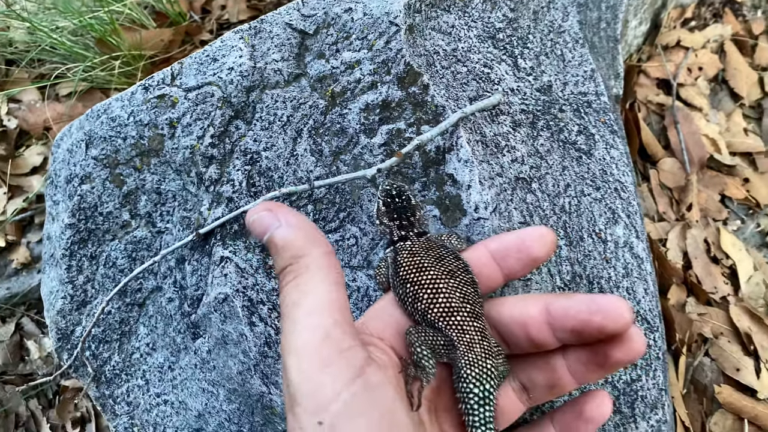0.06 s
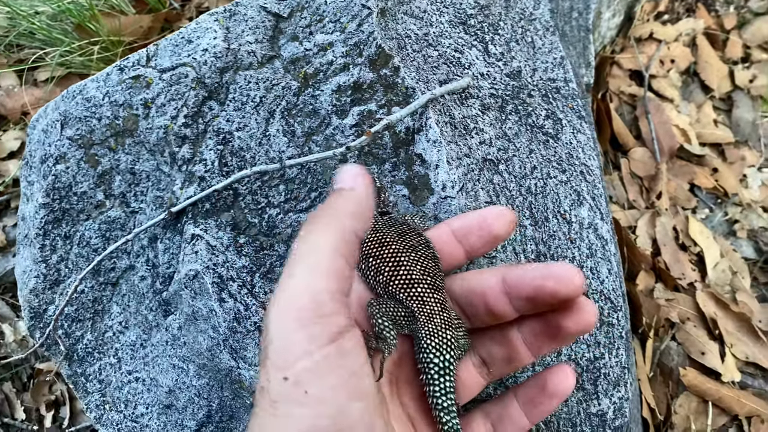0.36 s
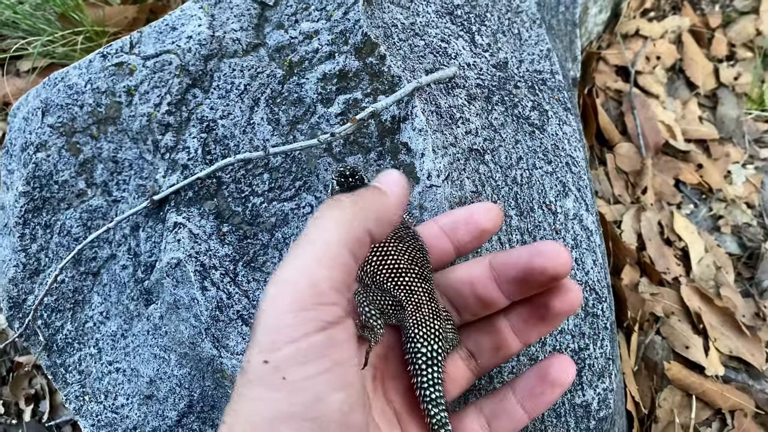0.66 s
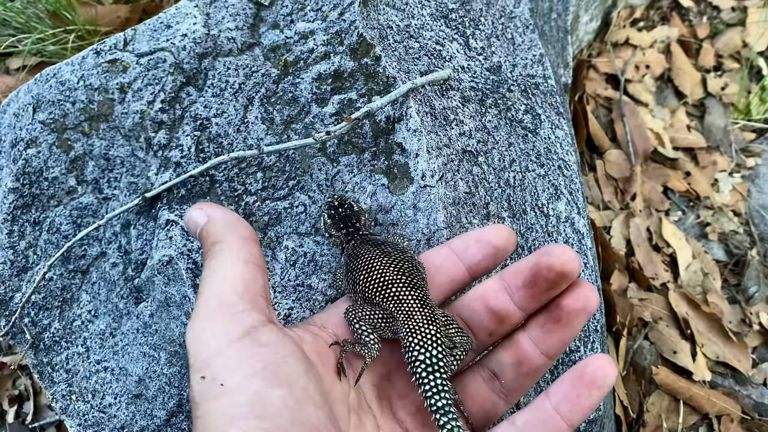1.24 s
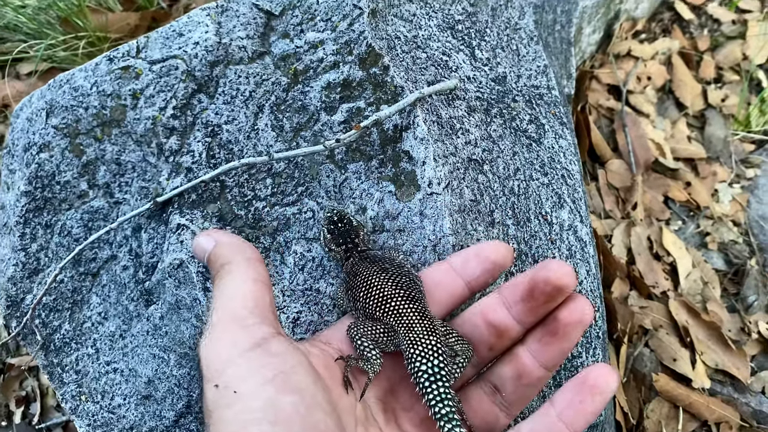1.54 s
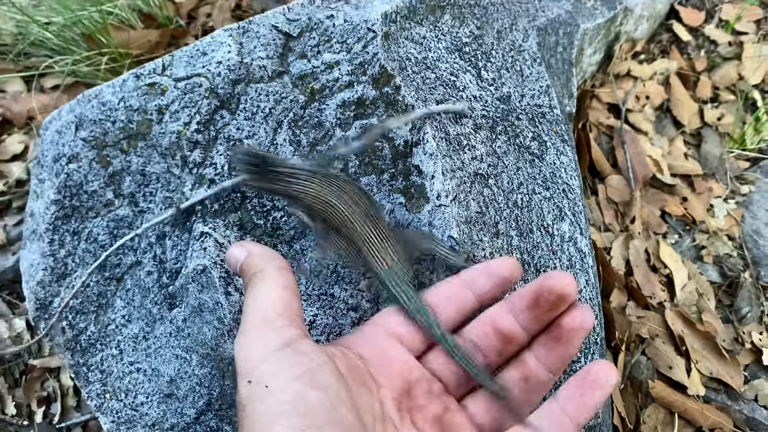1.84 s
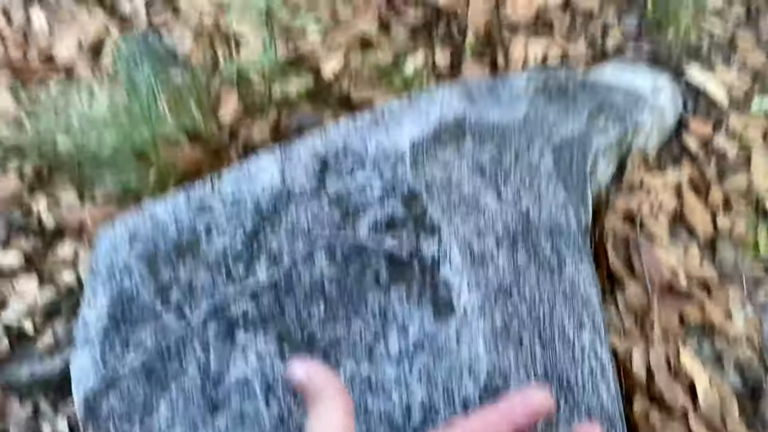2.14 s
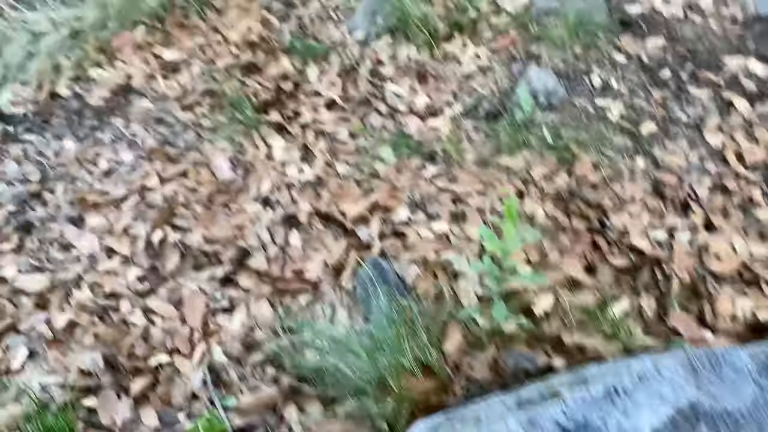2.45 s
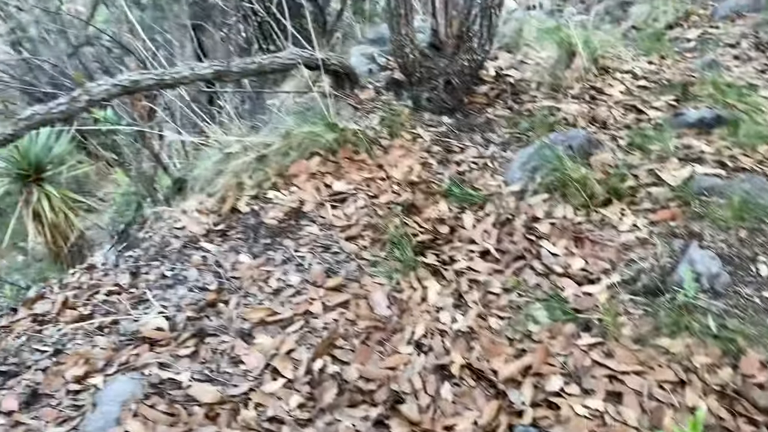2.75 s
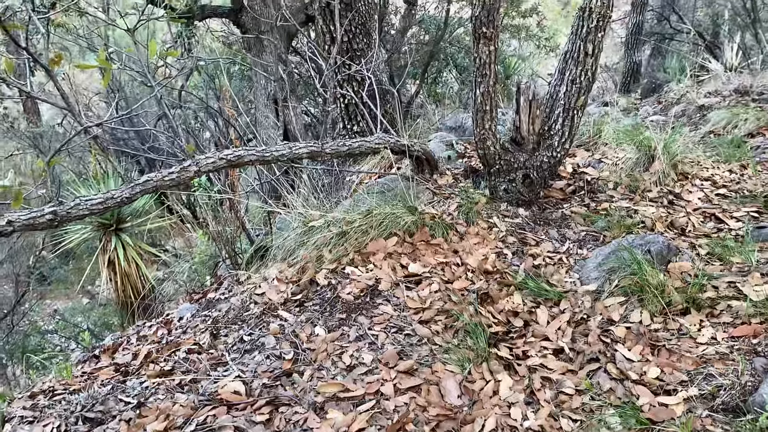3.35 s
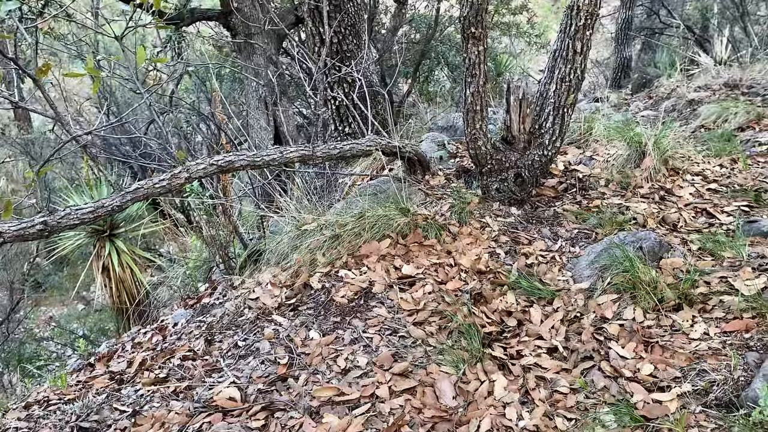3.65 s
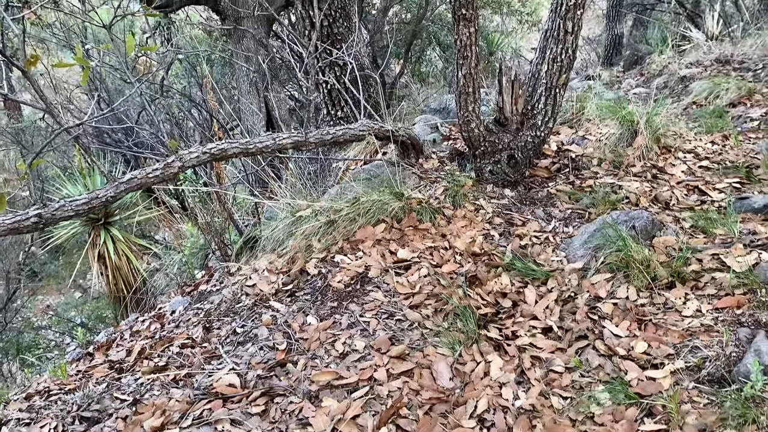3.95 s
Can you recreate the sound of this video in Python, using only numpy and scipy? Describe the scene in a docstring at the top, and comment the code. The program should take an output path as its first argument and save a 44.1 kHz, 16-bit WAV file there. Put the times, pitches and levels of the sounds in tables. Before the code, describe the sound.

A lizard leaps into dry leaves with a loud crackle and scurries off.

```python
"""A lizard scratches over a rock, leaps into dry oak leaves and scurries off in short dashes.
The leaves crackle as thousands of tiny ringing fractures; scales slide and claws tick.
Behind it: a faint wash of wind or a stream, a low rumble, one brief hum. A hand-held camera
swings after it: soft rubbing, small bumps, and two sharp knocks on the case at the end."""
import sys
import numpy as np
from scipy import signal
from scipy.fft import rfft, irfft
from scipy.io import wavfile

SR = 44100
rng = np.random.default_rng(int(sys.argv[2]) if len(sys.argv) > 2 else 0)


def materialize(psi):
    """Save the field psi as 16-bit PCM at rate SR to the path in sys.argv[1].

    A 1-D psi becomes a single channel; in a 2-D psi each row is a channel.
    """
    bounded = np.clip(np.atleast_2d(psi).T, -1, 1)
    quanta = np.round(bounded * 32767).astype(np.int16)
    wavfile.write(sys.argv[1], SR, quanta)


N = 176400
T, HZ = np.arange(N) / SR, np.fft.rfftfreq(N, 1 / SR)
BAND_EDGE_HZ = 15750

# Source spectra. Each row: frequency in Hz, relative level in dB.
WASH_SPECTRUM = [(30, -25), (300, -7), (500, -3), (900, 0), (1400, 0), (2300, 1), (3300, -4), (5200, -7.5),
                 (7500, -14), (10500, -25), (12000, -38), (15500, -46)]
RUMBLE_SPECTRUM = [(20, -32), (40, -17), (55, -5), (67, 5.5), (85, -6), (130, -3), (230, .5), (320, -9.5),
                   (500, -21), (1200, -45), (4000, -70)]
RUB_SPECTRUM = [(30, -34), (70, -13), (150, 1), (330, 2.5), (550, -5.5), (900, -9.5), (1400, -4),
                (2200, -9), (5000, -27), (15000, -55)]
GRIP_SPECTRUM = [(20, -32), (45, -9), (75, 1), (150, -10), (300, -25), (1000, -55), (4000, -75)]
DRAG_SPECTRUM = [(100, -24), (450, -5), (800, -9), (1350, -7), (1680, 3), (2100, -8), (3500, -16),
                 (8000, -28), (15000, -55)]
SCALE_SPECTRUM = [(300, -25), (2500, -9), (4300, -5), (6500, -9), (8500, -4), (10300, 1), (11300, -2),
                  (13000, -8), (15500, -6)]
CLAW_SPECTRUM = [(300, -22), (1500, -9), (2600, 2), (4300, -1), (6500, -6), (9800, 0), (11200, -1),
                 (13000, -8), (15500, -7)]
STIR_SPECTRUM = [(200, -12), (1000, -5.5), (2000, -6), (3100, -4.5), (4150, 3), (6000, -.5), (7800, -2),
                 (9700, 1), (11000, 0), (12500, -8.5), (15500, -14)]
DASH_SPECTRUM = [(200, -25), (1000, -15), (2150, -13), (2460, -2), (2750, -5.5), (3100, -.5), (3450, -8.5),
                 (3800, -4.5), (4900, -6.5), (5400, -1), (6300, -6), (7500, -6), (9400, 0), (10900, 1),
                 (12500, -6), (15500, -10)]
CRASH_SPECTRUM = [(100, -22), (220, -12), (520, -19), (800, -11.5), (1300, -14), (2000, -10.5), (2500, -6),
                  (3100, -5.5), (3600, -8), (4200, -4), (4600, -10), (5200, .8), (6300, 1.8), (7100, -1),
                  (7700, -3.5), (9400, -1.5), (11500, -.5), (13000, -9), (13900, -5), (14700, -13),
                  (15500, -14)]

# Level curves of the sustained sounds. Each row: time in seconds, level in dB.
WASH_LEVEL_DB = [(0, -64), (.4, -64), (.57, -63), (.85, -64), (1.1, -65), (1.35, -63.3), (1.55, -64.5),
                 (1.8, -63.5), (2.0, -63), (4.0, -63.5)]
RUMBLE_LEVEL_DB = [(0, -63.5), (.15, -61.5), (.38, -63.5), (.57, -59.5), (.85, -62.5), (1.05, -62),
                   (1.15, -64), (1.35, -59.5), (1.62, -63), (1.78, -59.5), (1.95, -62), (2.3, -61),
                   (2.9, -66), (3.4, -69), (4.0, -68)]
RUB_LEVEL_DB = [(0, -80), (.42, -80), (.55, -62), (.75, -72), (1.15, -82), (1.3, -66), (1.45, -70),
                (1.6, -80), (2.1, -76), (2.3, -63), (2.55, -58.5), (2.7, -59), (2.9, -57.5), (3.05, -61),
                (3.17, -64), (3.28, -59.5), (3.5, -59), (3.72, -63), (3.77, -61), (3.84, -64), (4.0, -63)]
STIR_LEVEL_DB = [(2.15, -90), (2.3, -59), (2.55, -61), (2.65, -66), (2.8, -62.5), (3.0, -60), (3.16, -65),
                 (3.25, -58.5), (3.38, -60), (3.49, -56.5), (3.56, -57.5), (3.68, -58.5), (3.78, -68),
                 (4.0, -72)]

# Lead of the left microphone port. Each row: frequency in Hz, phase in radians.
LEFT_LEAD_RAD = [(0, 0), (400, .5), (1600, 3.1), (2950, 6.3), (4700, 9.4), (6200, 12.5), (8000, 15.7),
                 (10000, 12.6), (12100, 9.4), (13900, 6.3), (15600, 3.1)]
# Likeness of the two ports. Each row: frequency in Hz, coherence from 0 to 1.
NOISE_COHERENCE = [(30, .1), (80, .3), (200, .6), (600, .45), (1500, .45), (3500, .3), (7000, .35),
                   (9500, .85), (15000, .8)]
STIR_COHERENCE = [(200, .8), (1500, .3), (5000, .3), (8000, .45), (9500, .92), (12000, .97), (15000, .92)]
LIZARD_COHERENCE = [(200, .9), (1500, .5), (2500, .6), (5000, .6), (8000, .6), (9500, .95), (12000, .98),
                    (15000, .92)]
CRASH_COHERENCE = [(200, .9), (1400, .88), (2300, .65), (2800, .9), (3600, .7), (4700, .95), (6100, .92),
                   (7000, .85), (8000, .99), (12000, .99), (15000, .96)]

# Single swells. Each row: start in seconds, level in dB, rise and hold in seconds, fade in dB/s.
HUM_SWELL = (3.125, -60, .02, .07, 200)
GRIP_SHIFT = (3.69, -57, .015, .02, 110)
FINGER_DRAGS = [(3.765, -56.5, .015, .012, 65), (3.888, -56, .003, .003, 250)]
SCALE_SLIDES = [(1.78, -61.5, .06, .025, 260), (1.945, -66, .01, .03, 400), (2.06, -70, .01, .03, 250)]
LANDING, SETTLING = (2.161, -29.5, .018, .016, 225), (2.228, -42.8, .022, .04, 170)
# Dashes through the leaves. Each row: the same five columns, then leaf resonance in Hz.
LEAF_DASHES = [(2.324, -48.5, .007, .006, 450, 2450), (2.395, -48, .009, .008, 450, 2700),
               (2.472, -47.5, .024, .016, 350, 3150), (2.51, -44, .005, .003, 800, 10300),
               (2.548, -48.5, .012, .008, 700, 3100), (2.714, -53, .018, .006, 500, 2480),
               (2.819, -49, .007, .006, 450, 4400), (2.852, -49, .015, .04, 140, 3950),
               (3.035, -55.5, .015, .045, 200, 3900), (3.458, -55, .012, .035, 200, 4050)]

# Bumps on the case. Each row: start in seconds, level in dB, treble cutoff in Hz, decay in seconds.
CASE_BUMPS = [(2.291, -40, 300, .012), (2.327, -37, 700, .005), (2.356, -41, 600, .005),
              (2.538, -35, 750, .005), (2.562, -38, 700, .004), (2.612, -41, 650, .005),
              (2.697, -42, 400, .007), (2.819, -39, 550, .005), (3.009, -37, 900, .004),
              (3.469, -37, 850, .004), (3.496, -41, 750, .004), (3.6, -44, 700, .004),
              (3.621, -40, 700, .004), (3.683, -40, 550, .005), (3.755, -38, 600, .004),
              (3.7595, -32, 1100, .003), (3.763, -34, 750, .004), (3.777, -44, 300, .012),
              (3.890, -42, 1400, .0025), (3.926, -17.5, 7800, .0076), (3.983, -22.7, 4800, .0062),
              (3.9861, -31.5, 2200, .0045)]
# Claws on rock; leaves breaking under the landing. Each row: start in seconds, level in dB.
CLAW_TICKS = [(1.866, -39), (1.909, -44), (1.952, -33.5), (1.964, -39), (1.975, -41), (1.986, -34.5),
              (1.999, -44), (2.068, -42), (2.087, -46), (2.101, -44)]
LEAF_BREAKS = [(2.1695, -24), (2.183, -20), (2.193, -22), (2.208, -25), (2.214, -25), (2.2325, -27),
               (2.2425, -16.5), (2.259, -26), (2.2885, -26), (2.31, -29)]
# Single leaves snapping. Each row: start in seconds, level in dB, leaf resonance in Hz.
LEAF_SNAPS = [(2.333, -27, 2500), (2.36, -28, 12200), (2.405, -33, 3200), (2.414, -33, 2550),
              (2.516, -22.5, 10400), (2.733, -29.5, 3100), (2.827, -36, 9700), (3.499, -33, 4000),
              (3.729, -38, 9200), (3.837, -31, 8800)]


def amp(db):
    """Decibels to gain."""
    return 10 ** (np.asarray(db) / 20)


def unit_rms(x):
    """Scales to rms 1."""
    return x / np.sqrt(np.mean(x ** 2) + 1e-20)


def over_frequency(points):
    """Interpolates a table over log frequency."""
    hz, value = np.transpose(points)
    return np.interp(np.log(HZ + 1), np.log(hz + 1), value)


def gain_curve(points):
    """A dB curve as gain over time."""
    return amp(np.interp(T, *np.transpose(points)))


def swell(start_s, db, rise_s, hold_s, fade_db_per_s):
    """Envelope: linear rise, hold, exponential fade."""
    fading_s = np.maximum(T - start_s - rise_s - hold_s, 0)
    return np.clip((T - start_s) / rise_s, 0, 1) * amp(db - fade_db_per_s * fading_s)


def add_at(mix, start_s, sound):
    """Mixes a sound in place."""
    part = mix[..., round(start_s * SR):][..., :sound.shape[-1]]
    part += sound[..., :part.shape[-1]]


def drift(rate_hz):
    """Low-passed random wander, rms 1."""
    return unit_rms(irfft(rfft(rng.standard_normal(N)) * (HZ > 0) / (1 + (HZ / rate_hz) ** 4), N))


def mic_ports(pair, spectrum, coherence):
    """Colours two unrelated signals and blends them into the left and right microphone ports."""
    shared, apart = rfft(pair) * unit_rms(amp(over_frequency(spectrum)))
    likeness = np.clip(over_frequency(coherence), 0, 1)
    shared *= np.sqrt((1 + likeness) / 2)
    apart *= np.sqrt((1 - likeness) / 2)
    right_lag = np.exp(-1j * np.interp(HZ, *np.transpose(LEFT_LEAD_RAD)))
    return irfft(np.array([shared + apart, (shared - apart) * right_lag]), N)


def noise(spectrum, gain, flutter_db, rate_hz):
    """Coloured stereo noise with a fluttering level."""
    flutter = unit_rms(amp(flutter_db * drift(rate_hz)))
    return mic_ports(rng.standard_normal((2, N)) * gain * flutter, spectrum, NOISE_COHERENCE)


def crackle(per_s, spread_db, ring_s, clump_db, pitches=64):
    """Clumps of tiny fractures, each ringing briefly at one of many pitches."""
    t, out = np.arange(192) / SR, np.zeros((2, N))
    size = amp(spread_db * np.minimum(rng.exponential(1, (2, N)), 4))
    polarity = rng.choice([-1, 1], (2, N))
    impulses = size * polarity * (rng.random((2, N)) < per_s / SR)
    pitch_index = rng.integers(0, pitches, (2, N))
    for k, hz in enumerate(np.linspace(SR / 128, BAND_EDGE_HZ, pitches)):
        decay = np.exp(-t / (ring_s * rng.uniform(.5, 1.5)))
        ring = unit_rms(decay * np.cos(2 * np.pi * (hz * t + rng.random())))
        side, onset = np.nonzero((pitch_index == k) & (impulses != 0))
        samples = (onset[:, None] + np.arange(len(t))) % N
        np.add.at(out, (side[:, None], samples), impulses[side, onset, None] * ring)
    return unit_rms(out * amp(clump_db * drift(rate_hz=110)))


def cracks(rows, decay_s):
    """Sharp cracks, each a fast-decaying noise burst."""
    t, out = np.arange(1024) / SR, np.zeros((2, N))
    for start_s, db in rows:
        burst = rng.standard_normal((2, len(t))) * np.exp(-t / decay_s)
        add_at(out, start_s, amp(db) * burst / abs(burst).max())
    return out


def scatter(x, rt60_s=.06, tail_db=-12):
    """Adds a short, thin tail from ground and trunks."""
    t = np.arange(SR // 4) / SR
    tail = rng.standard_normal((2, len(t))) * amp(-60 * t / rt60_s) * np.minimum(t / .003, 1)
    return x + amp(tail_db) * signal.fftconvolve(x, tail / np.linalg.norm(tail[0]), axes=1)[:, :N]


def leaf_curl(x, hz, width_hz=350, db=-1):
    """Adds the hollow resonance of a curled leaf."""
    return x + amp(db) * signal.lfilter(*signal.iirpeak(hz, hz / width_hz, fs=SR), x)


def air():
    """Distant wind or water over a lumpy rumble, slightly to the right."""
    wash = noise(WASH_SPECTRUM, gain_curve(WASH_LEVEL_DB), flutter_db=.5, rate_hz=8)
    rumble = noise(RUMBLE_SPECTRUM, gain_curve(RUMBLE_LEVEL_DB), flutter_db=1.5, rate_hz=14)
    return (wash + rumble) * amp([[-.6], [.6]])


def hum(hz=140):
    """A brief, wavering low tone."""
    return unit_rms(np.sin(2 * np.pi * hz * T)) * swell(*HUM_SWELL) * amp(drift(rate_hz=25))


def fingers():
    """Fingers rub the case, shift grip and drag."""
    rub = noise(RUB_SPECTRUM, gain_curve(RUB_LEVEL_DB), flutter_db=2.5, rate_hz=40)
    thud = noise(GRIP_SPECTRUM, swell(*GRIP_SHIFT), flutter_db=1, rate_hz=20)
    drag = noise(DRAG_SPECTRUM, sum(swell(*row) for row in FINGER_DRAGS), flutter_db=2.5, rate_hz=90)
    return rub + thud + drag


def bumps(chirp_cycles=1.23, lag_s=.00009, rise_s=.00005, far_db=-3, far_rad=1.7, far_cutoff_hz=900):
    """Each bump on the case arrives as a fast falling chirp, duller at the far port."""
    t, out = np.arange(4096) / SR, np.zeros((2, N))
    hz = chirp_cycles / (t + lag_s)
    phase = 2 * np.pi * chirp_cycles * np.log(1 + t / lag_s)
    far_gain = amp(far_db) / np.hypot(1, hz / far_cutoff_hz)
    chirp = np.array([np.sin(phase), far_gain * np.sin(phase + far_rad)])
    for start_s, db, cutoff_hz, decay_s in CASE_BUMPS:
        envelope = amp(db) * np.minimum(t / rise_s, 1) * np.exp(-t / decay_s)
        add_at(out, start_s, -envelope * chirp / np.hypot(1, (hz / cutoff_hz) ** 2))
    return out


def camera_case(x, dip_hz=2600, dip_q=1.1, dip_db=-4.5, cutoff_hz=7500):
    """The case damps the upper midrange and passes little high treble."""
    midrange = signal.lfilter(*signal.iirpeak(dip_hz, dip_q, fs=SR), x)
    damped = x - (1 - amp(dip_db)) * midrange
    return signal.sosfilt(signal.butter(6, cutoff_hz, fs=SR, output="sos"), damped)


def lizard_on_rock():
    """Scales slide and claws tick before the jump."""
    slides = crackle(per_s=12000, spread_db=2.2, ring_s=.0003, clump_db=1.2)
    slides *= sum(swell(*row) for row in SCALE_SLIDES)
    claws = cracks(CLAW_TICKS, decay_s=.0014)
    return (mic_ports(slides, SCALE_SPECTRUM, LIZARD_COHERENCE)
            + mic_ports(claws, CLAW_SPECTRUM, LIZARD_COHERENCE))


def leaf_stir():
    """Leaves stir steadily as the lizard runs off."""
    stir = crackle(per_s=12000, spread_db=3.1, ring_s=.0006, clump_db=1.1)
    return mic_ports(scatter(stir * gain_curve(STIR_LEVEL_DB)), STIR_SPECTRUM, STIR_COHERENCE)


def lizard_dashes():
    """Short runs rustle curled leaves; single ones snap."""
    litter = crackle(per_s=9000, spread_db=3, ring_s=.0009, clump_db=1.3)
    dashes = sum(leaf_curl(litter * swell(*move), hz) for *move, hz in LEAF_DASHES)
    snaps = sum(leaf_curl(cracks([snap], decay_s=.0012), hz) for *snap, hz in LEAF_SNAPS)
    return mic_ports(scatter(dashes + snaps), DASH_SPECTRUM, LIZARD_COHERENCE)


def lizard_landing():
    """Dry leaves crush and break under the lizard, then settle."""
    crush = crackle(per_s=9500, spread_db=3, ring_s=.001, clump_db=1.1)
    crush *= np.hypot(swell(*LANDING), swell(*SETTLING))
    breaks = cracks(LEAF_BREAKS, decay_s=.001)
    return mic_ports(scatter(crush + breaks), CRASH_SPECTRUM, CRASH_COHERENCE)


def scene():
    """Lizard, background and camera handling, in stereo."""
    lizard = lizard_on_rock() + lizard_landing() + lizard_dashes() + leaf_stir()
    return lizard + air() + hum() + camera_case(fingers() + bumps())


def record(dry):
    """Steep low-pass at the band edge."""
    lowpass = signal.firwin(511, BAND_EDGE_HZ, window=("kaiser", 9), fs=SR)
    return signal.oaconvolve(dry, lowpass[None], "same")


dry = scene()
out = record(dry)
materialize(out)
```